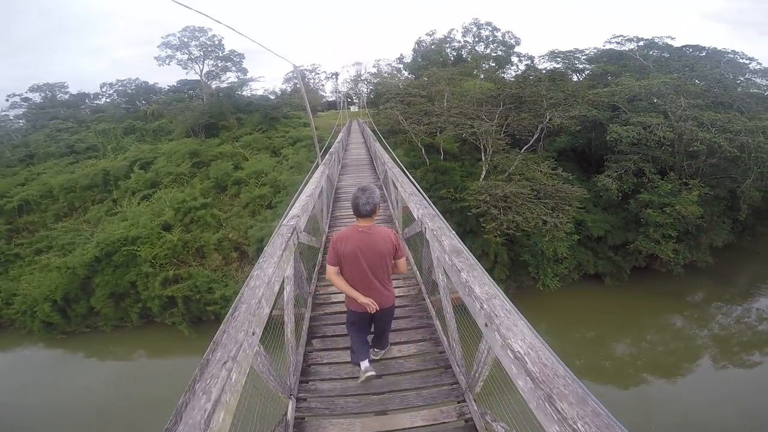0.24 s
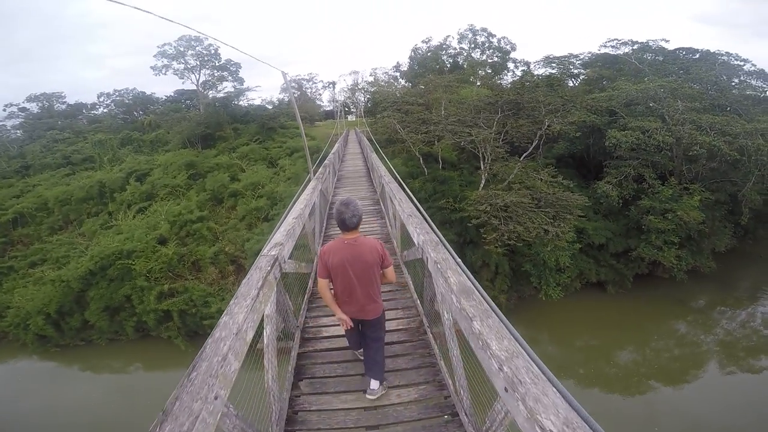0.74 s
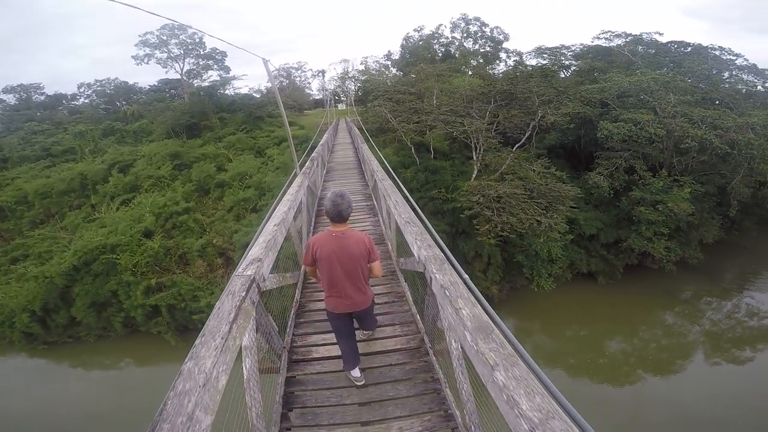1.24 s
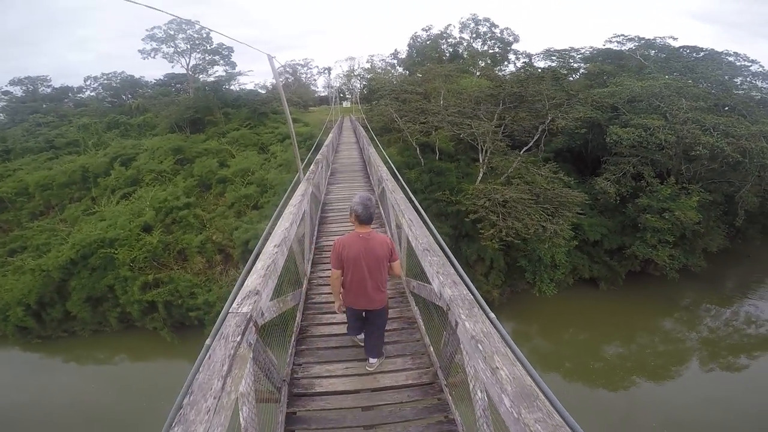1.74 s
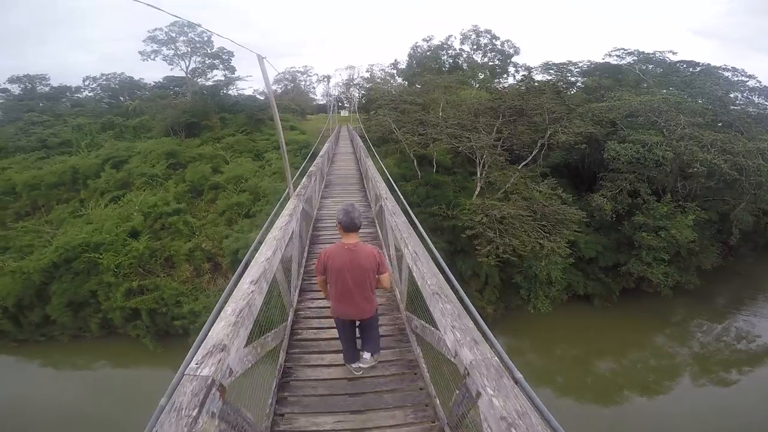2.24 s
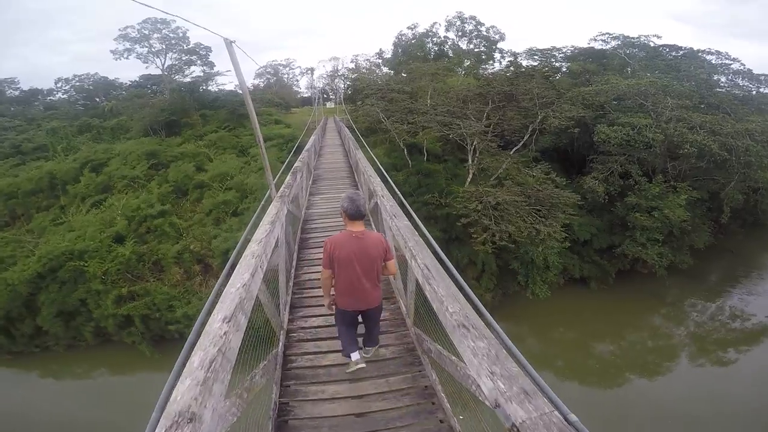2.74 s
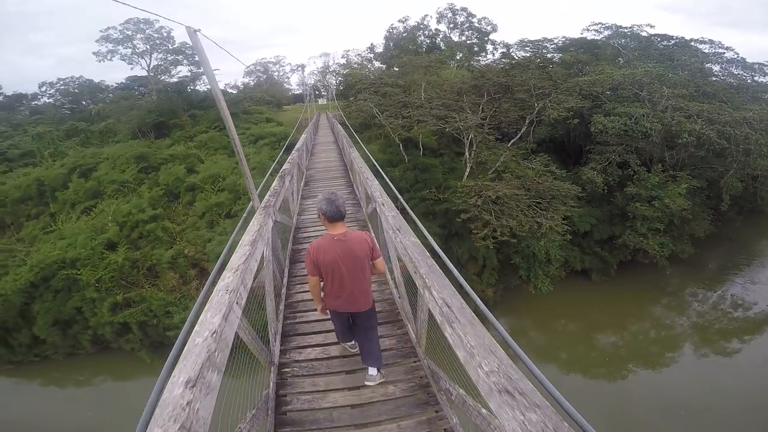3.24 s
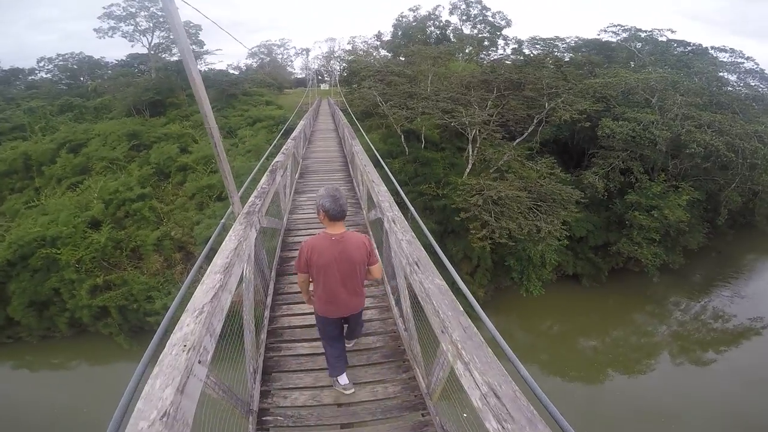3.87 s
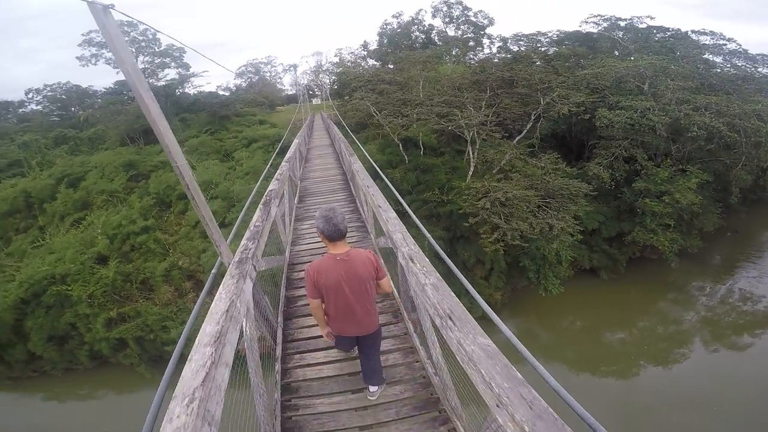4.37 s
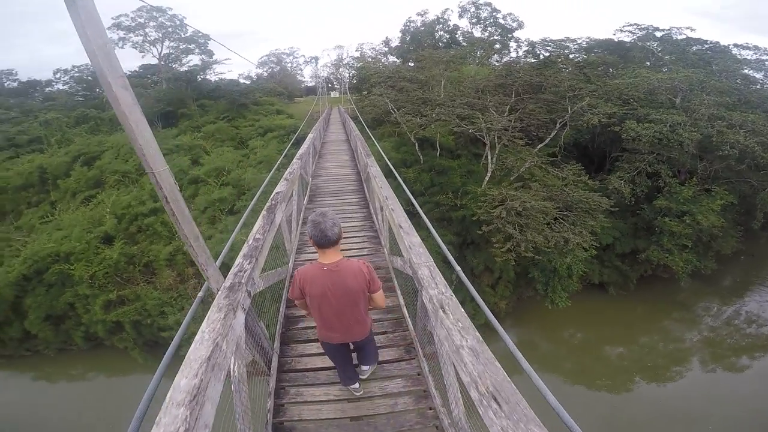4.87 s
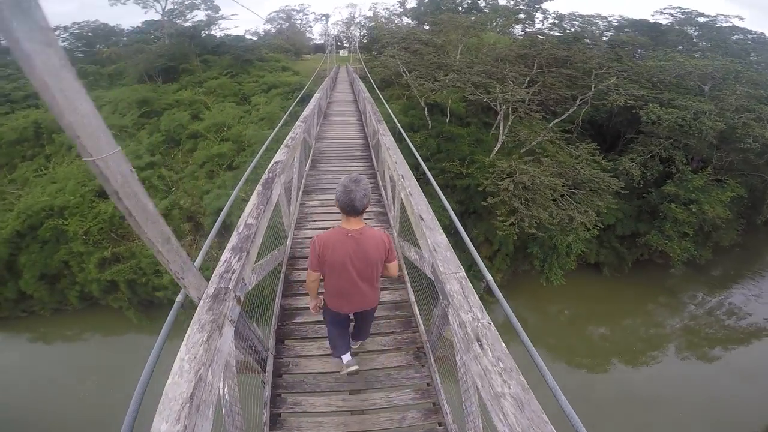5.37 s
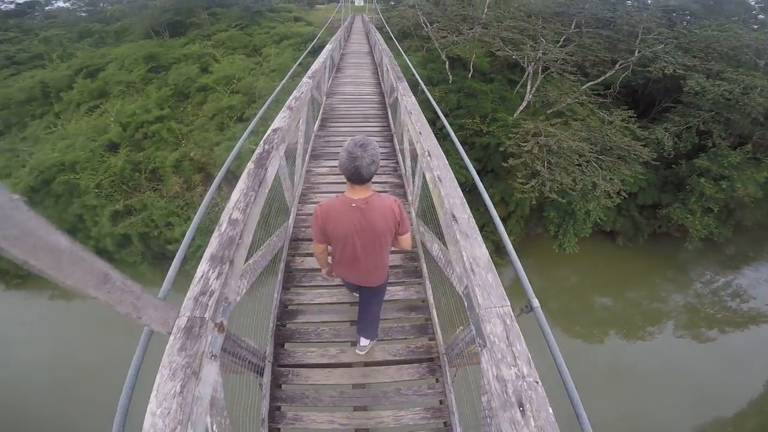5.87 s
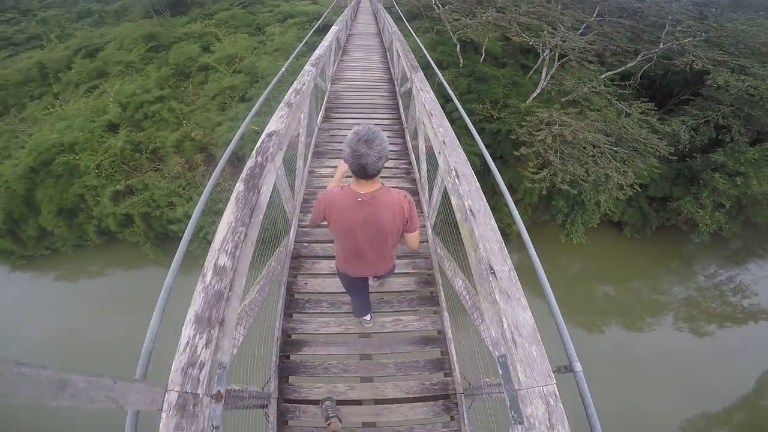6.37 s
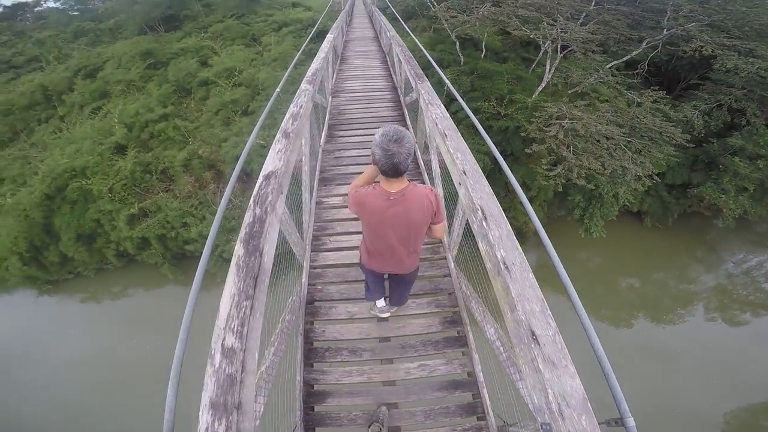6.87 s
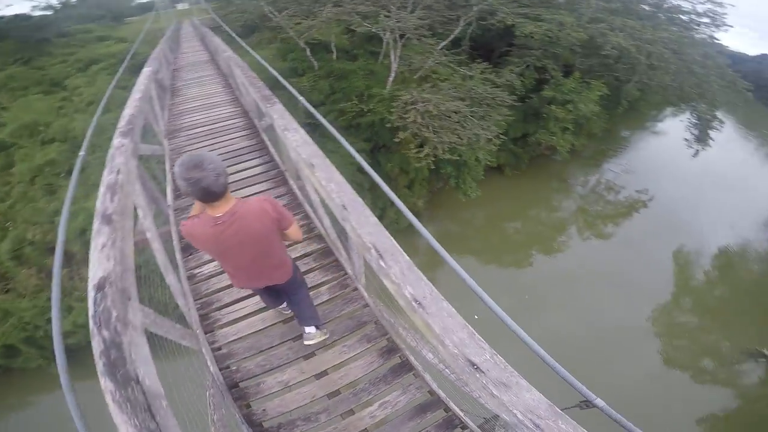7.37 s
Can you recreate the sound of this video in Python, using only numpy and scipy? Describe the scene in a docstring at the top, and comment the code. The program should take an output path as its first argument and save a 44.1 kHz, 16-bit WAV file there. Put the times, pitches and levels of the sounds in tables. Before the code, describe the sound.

Two people walk across an old wooden footbridge above a slow river. Shoes clack, knock and scuff unevenly on loose planks, with faint rattles and low beam drumming after steps. A hand-held microphone pole bumps and hums softly, with deep sway and wind rumble. Birds whistle and chirp from the forested bank with echoes. A joint creaks around five seconds, then tocks dully.

```python
"""Two people walk over the loose planks of a footbridge above a slow river, one with a microphone on a pole.
Shoes clack and scuff: rough contacts ring the resonances of planks and beams, and joints slip with creaks.
The pole hums in decaying sines as the hand bumps it, and sways at low pitch; wind noise rumbles on the microphone.
Birds whistle and chirp on the bank as bending sines with echoes, over a noise hush of leaves, water and insects."""
import sys
import numpy as np
from scipy import signal
from scipy.fft import rfft, irfft
from scipy.io import wavfile

SR = 44100
rng = np.random.default_rng(int(sys.argv[2]) if len(sys.argv) > 2 else 0)


def transcribe(signal):
    """Save signal, clipped to [-1, 1], as a 16-bit WAV file at the path in sys.argv[1]."""
    frames = np.atleast_2d(signal).T
    limited = np.clip(frames, -1, 1)
    pcm = np.round(limited * 32767).astype(np.int16)
    wavfile.write(sys.argv[1], SR, pcm)


N = 335160
TIME = np.arange(N) / SR  # seconds

# Feet that land and take weight. Each row: start in seconds, then relative levels: clack in dB, low knock
# against the clack in dB, sole snap against the clack in dB, beam drumming in dB.
FOOTFALLS = [(0.007, -48, -14, -21, -49.5), (0.695, -57, -20, 1, -55.5), (0.883, -46.5, -0.5, -3, -52.5),
             (1.365, -48, -7.5, 2, -51), (1.425, -51, -13, -10, -52), (1.998, -42, -5.5, -6, -53),
             (2.63, -48, -7, -9.5, -51.5), (2.82, -62.5, 8.5, -2, -59), (3.37, -45, -3, -5.5, -51),
             (3.93, -44.5, -11, -7, -54.5), (4.561, -53.5, -7, -2.5, -55), (5.327, -55.5, 7, -7, -69),
             (5.922, -57, -7, -16, -61), (6.519, -40.5, -13.5, -5.5, -51.5), (6.595, -42, -20, -5.5, -60),
             (7.301, -46.5, -12, 3.5, -47.5)]
# Plank resonances. Each row: frequency in Hz, bandwidth in Hz, relative level in dB.
PLANK_MODES = [(408, 170, -3.5), (525, 88, 0.5), (734, 260, -3), (823, 23.6, 7.5), (890, 95, 5),
               (976, 71, 10), (1041, 43, 7.5), (1205, 280, 0), (1754, 310, -3.5), (2460, 480, -6.5),
               (3530, 300, 3.5), (4127, 366, -2.5), (5210, 97, -5), (6960, 2250, -16), (10800, 9900, -51)]


def from_db(db):
    """The decibel is logarithmic: 20 dB is a tenfold amplitude."""
    return 10 ** (np.asarray(db) / 20)


def rms_one(x):
    """Normalisation: mean power is brought to one."""
    return x / np.sqrt(np.mean(x ** 2) + 1e-20)


def add(track, s, sound):
    """Superposition: a sound is summed into the track from time s in seconds."""
    at = int(np.clip(s * SR, 0, N - 1))
    track[at:at + len(sound)] += sound[:N - at]


def drift(rate):
    """Slow random modulation: straight lines join normal random knots, rate of them a second."""
    knots = rng.standard_normal(4000)
    return np.interp(TIME * rate, np.arange(len(knots)), knots)


def coloured_noise(spectrum):
    """Spectral shaping: white noise is weighted over log frequency, then brought to unit rms."""
    hz, db = np.transpose(spectrum)
    bins = np.maximum(np.fft.rfftfreq(N, 1 / SR), 1)
    weight = from_db(np.interp(np.log(bins), np.log(hz), db))
    return rms_one(irfft(rfft(rng.standard_normal(N)) * weight, N))


def resonate(x, hz, width):
    """Damped resonance: a pole pair rings at hz with the given bandwidth and unit peak gain."""
    r = np.exp(-np.pi * width / SR)
    zeros = np.array([1, 0, -1]) * (1 - r * r) / 2
    poles = [1, -2 * r * np.cos(2 * np.pi * hz / SR), r * r]
    return signal.lfilter(zeros, poles, x + 1e-18)


def ring_modes(force, modes):
    """Modal synthesis: each mode rings to its own level, neighbours in opposite phase."""
    out = 0
    for k, (hz, width, db) in enumerate(modes):
        ring = resonate(force, hz, width)
        gain = from_db(db) * np.sqrt(width / SR) / np.linalg.norm(ring)
        out = out + (-1) ** k * gain * ring
    return out


def contact(length, grain_db):
    """Rough contact: two faces meet in a quick, dying run of tiny uneven impacts of unit total energy."""
    t = TIME[:SR // 5]
    force = rng.standard_normal(len(t)) * from_db(grain_db * rng.standard_normal(len(t)))
    force *= (1 - np.exp(-t / .001)) * np.exp(-t / max(length, .0003))
    return force / np.linalg.norm(force)


def scatter(x, t60, wet_db):
    """Diffuse reflection: a noise tail, starting after 6 ms, falls 60 dB in t60 seconds."""
    t = TIME[:SR]
    tail = rng.standard_normal(SR) * np.exp(-np.log(1000) * t / t60) * (t > .006)
    return x + from_db(wet_db) * signal.fftconvolve(x, tail / np.linalg.norm(tail))[:N]


def swells(pushes, rise_s, decay_s):
    """Superposed envelopes: each push (s, dB) builds up and dies away exponentially."""
    out, t = np.zeros(N), TIME[:SR]
    for s, db in pushes:
        add(out, s, from_db(db) * (1 - np.exp(-(t / rise_s) ** 2)) * np.exp(-t / decay_s))
    return out


def forest(level_db):
    """Broadband and narrow-band noise: an even hush of leaves and water, with a few thin tones on top."""
    # Forest hush. Each row: frequency in Hz, relative density in dB per Hz.
    hush_spectrum = [(120, -30), (200, -1.5), (258, -6.5), (521, -10), (748, -12), (964, -10.5),
                     (1410, -15), (2300, -13.5), (2700, -15), (3540, -14.5), (4480, -19), (5470, -16.5),
                     (8290, -23), (13300, -27.5), (15000, -31)]
    # Thin steady tones. Each row: frequency in Hz, bandwidth in Hz, rms level in dB.
    thin_tones = [(3630, 330, -78.5), (4150, 270, -85.5), (5470, 67, -86.5), (12230, 11, -93)]
    out = coloured_noise(hush_spectrum) * from_db(level_db)
    for hz, width, db in thin_tones:
        out = out + from_db(db) * rms_one(resonate(rng.standard_normal(N), hz, width))
    return out


def rumble(sway_hz, sway_wander, sway_db, wind_db, gust_db, draught_db, shudder_db):
    """Bending and turbulence: jolts sway the pole's lowest mode; gusts, sway and steps stir air at the mic."""
    # Jerks of the arm that set the pole swaying. Each row: start in seconds, relative level in dB.
    jolts = [(0.0, -33.5), (0.69, -31.5), (1.02, -28.5), (1.41, -25), (1.65, -31.5), (1.88, -24.5),
             (2.69, -21.5), (2.92, -45), (3.35, -26.5), (3.96, -29), (4.15, -33), (4.61, -32.5),
             (5.28, -28.5), (5.63, -33.5), (5.88, -26.5), (6.49, -27), (6.83, -31), (7.17, -24)]
    # Breeze at the microphone, joined by straight lines. Each row: time in seconds, relative level in dB.
    breeze_level = [(0, -51), (.4, -63), (1.4, -49.5), (2.5, -58), (3.3, -49), (4.6, -59), (5.25, -44.5),
                    (5.8, -55.5), (6.5, -52), (7.6, -51)]
    # Wind noise. Each row: frequency in Hz, relative density in dB per Hz.
    wind_spectrum = [(20, 10), (38, 6), (60, 5.5), (100, 0), (140, -9), (185, -13), (250, -24.5),
                     (400, -35), (800, -48)]
    swing = swells(jolts, rise_s=0.021, decay_s=0.13)
    # the microphone shudders at each footfall
    steps = [(s, db + shudder_db) for s, *_, db in FOOTFALLS]
    shudder = swells(steps, rise_s=0.011, decay_s=0.065)

    wandering_hz = sway_hz * (1 + sway_wander * drift(16))
    sway = rms_one(np.sin(2 * np.pi * np.cumsum(wandering_hz) / SR))
    # the unsteady arm never lets the pole rest entirely
    unrest = from_db(-41.5 + 2.5 * drift(7))
    sway_level = np.hypot(swing * from_db(sway_db), unrest)

    breeze = from_db(np.interp(TIME, *np.transpose(breeze_level)) + wind_db + gust_db * drift(12))
    air_level = np.sqrt(breeze ** 2 + (swing * from_db(draught_db)) ** 2 + shudder ** 2)
    return sway * sway_level + coloured_noise(wind_spectrum) * air_level


def footsteps(level_db, knock_db, board_db, snap_db):
    """Modal excitation: each contact rings the plank; the landing weights low, middle and high modes."""
    # Shoes graze the boards without weight. Each row: start in seconds, relative clack level in dB,
    # sole snap against the clack in dB.
    scuffs = [(0.074, -66, -7), (0.213, -56, 1), (2.021, -50.5, 1.5), (2.703, -54.5, 2.5), (3.306, -50, -1),
              (3.339, -52, -5), (3.835, -61, -8), (4.025, -55.5, -7), (4.458, -61, -6),
              (5.288, -57.5, -2.5), (5.861, -59, -1), (6.505, -54.5, -23), (7.201, -65, 1),
              (7.295, -48.5, -3), (7.317, -44, -24), (7.334, -51.5, 9)]
    footfall_contact_s, scuff_contact_s = 0.0075, 0.005
    scuff_knock_db = -12  # before knock_db is added
    out = np.zeros(N)
    hz, width, mode_db = np.transpose(PLANK_MODES)
    touches = [(s, db, knock, snap, footfall_contact_s) for s, db, knock, snap, _ in FOOTFALLS]
    touches += [(s, db, scuff_knock_db, snap, scuff_contact_s) for s, db, snap in scuffs]
    for s, db, knock, snap, length in touches:
        weights_db = [knock + knock_db, board_db, board_db, snap + snap_db]
        colour = np.interp(hz, [550, 750, 2200, 3300], weights_db)
        plank = zip(hz, width, mode_db + colour)
        add(out, s, from_db(db + level_db) * ring_modes(contact(length, grain_db=4.5), plank))
    # the deck and railings rattle on after each step
    rattle = scatter(out, t60=0.17, wet_db=-10.5)
    return scatter(rattle, t60=0.58, wet_db=-14.0)


def shuffle(level_db, rise_s, decay_s, grain_db):
    """Sliding friction: as the weight rolls over it, the sole rubs softly on the grit of the plank."""
    # What a rubbing sole stirs in the plank. Each row: frequency in Hz, bandwidth in Hz, relative level in dB.
    rub_modes = [(315, 126, 3.5), (690, 270, -3.5), (1060, 520, -3)]
    pressure = swells([(s, db) for s, *_, db in FOOTFALLS], rise_s, decay_s)
    grit = rng.standard_normal(N) * from_db(grain_db * drift(90))
    return from_db(level_db) * pressure * rms_one(ring_modes(grit, rub_modes))


def beams(level_db, press_s):
    """Slower loading: the walker's weight makes the beams under the planks drum in their low modes."""
    # Beam resonances. Each row: frequency in Hz, bandwidth in Hz, relative level in dB.
    beam_modes = [(242, 19, -1.5), (278.3, 7.4, 1.5), (308.7, 17, -3.5), (382, 49, -28)]
    out = np.zeros(N)
    for s, *_, db in FOOTFALLS:
        press = contact(press_s, grain_db=6.5)
        add(out, s, from_db(db + level_db) * ring_modes(press, beam_modes))
    return out


def settling(count, level_db, within_s):
    """Delayed slip: loose boards shift faintly count times after each foot has loaded them."""
    out = np.zeros(N)
    for s, *_ in FOOTFALLS:
        for late, weak, long in rng.random((count, 3)):
            shift = ring_modes(contact(.003 + 0.012 * long, grain_db=1.0), PLANK_MODES)
            add(out, s + .03 + within_s * late, from_db(level_db - 8.7 * weak) * shift)
    return out


def bird(notes, waver, flutter_db, taper):
    """Frequency modulation: near-pure notes bend through three pitches, swelling and fading."""
    out, tremble, flutter = np.zeros(N), drift(130), drift(45)
    for s, length, start, middle, end, db in notes:
        u = np.linspace(0, 1, int(length * SR))  # progress through the note
        here = (int(s * SR) + np.arange(len(u))) % N
        parabola = np.polyfit([0, .5, 1], [start, middle, end], 2)
        hz = np.polyval(parabola, u) * (1 + waver * tremble[here])
        swell = np.abs(np.sin(np.pi * u)) ** taper * from_db(db + flutter_db * flutter[here])
        add(out, s, swell * np.sin(2 * np.pi * np.cumsum(hz) / SR))
    return out


def bent(calls, bend):
    """Pitch glide: every call starts and ends the same (start, end) Hz away from its own middle pitch."""
    return [(s, length, hz + bend[0], hz, hz + bend[1], db) for s, length, hz, db in calls]


def repeated(calls, length, hz, bend):
    """Stereotyped song: one note has the same length, pitch and glide every time."""
    return bent([(s, length, hz, db) for s, db in calls], bend)


def birds():
    """Source and reverberation: several birds sing on the bank, each echoed by the trees."""
    # Long level whistles of two birds, one pitched above the other. Each row: start in seconds,
    # length in seconds, middle pitch in Hz, starting offset from it in Hz, relative level in dB.
    whistle_calls = [(0.069, 0.2, 2602, 105, -61), (1.04, 0.23, 2582, 70, -59), (1.93, 0.22, 2597, -9, -59),
                     (2.92, 0.2, 2599, -34, -59.5), (3.32, 0.18, 2888, -40, -68),
                     (3.81, 0.22, 2852, -52, -67.5), (4.09, 0.19, 2597, -42, -64),
                     (4.31, .228, 2830, -53, -66.5), (4.81, 0.19, 2797, -2, -65),
                     (5.33, 0.23, 2823, -57, -69), (5.91, .258, 2826, -67, -71.5)]
    # Arched calls, high notes that rise and level off, and short plain pips of other birds.
    # Each row: start in seconds, length in seconds, middle pitch in Hz, relative level in dB.
    arches = [(1.85, 0.09, 3830, -59.5), (2.09, 0.21, 3370, -62.5), (4.745, 0.083, 3690, -54.5),
              (4.95, .25, 3350, -59.5), (7.5, 0.22, 3520, -60)]
    upslurs = [(4.28, .075, 4130, -71), (4.42, 0.068, 4160, -71), (4.91, .07, 4030, -63.5),
               (5.795, 0.09, 3940, -56), (6.33, 0.075, 3970, -57), (6.865, .06, 4030, -56),
               (7.45, 0.082, 4050, -66.5)]
    pips = [(.075, 0.013, 7270, -63.5), (.715, 0.032, 8280, -66), (2.81, 0.041, 2950, -63),
            (5.845, .035, 2070, -63.5), (6.66, 0.036, 3740, -61), (7.55, 0.059, 2840, -63.5)]
    # Falling slurs, sharp rising chirps about a second apart, and low, steeply peaked yelps.
    # Each row: start in seconds, relative level in dB.
    falls = [(2.81, -66), (6.02, -67.5)]
    peep_calls = [(.707, -45.5), (1.603, -50), (2.583, -47), (3.763, -47)]
    yelp_calls = [(.938, -58.5), (1.824, -58), (2.81, -58), (3.976, -60)]
    # Glides of these calls. Each pair: start and end in Hz from the middle pitch.
    arch_bend = (-330, -430)
    upslur_bend = (-200, 10)
    pip_bend = (42, -42)
    fall_bend = (250, -310)
    peep_bend = (-230, 170)
    yelp_bend = (-600, -700)

    lift_hz = 37.4  # every whistle ends a little above its middle pitch
    whistles = [(s, length, hz + above, hz, hz + lift_hz, db) for s, length, hz, above, db in whistle_calls]
    slurs = bent(arches, arch_bend) + bent(upslurs, upslur_bend) + bent(pips, pip_bend)
    slurs += repeated(falls, length=0.13, hz=3320, bend=fall_bend)
    peeps = repeated(peep_calls, length=0.0264, hz=3560, bend=peep_bend)
    yelps = repeated(yelp_calls, length=0.039, hz=2020, bend=yelp_bend)

    whistler = scatter(bird(whistles, waver=0.0037, flutter_db=1.3, taper=0.84), t60=0.9, wet_db=-8.0)
    callers = scatter(bird(slurs, waver=0.0064, flutter_db=0.5, taper=0.78), t60=1.0, wet_db=-6.0)
    chirper = scatter(bird(peeps, waver=0.015, flutter_db=1.5, taper=0.81), t60=1.0, wet_db=-10.5)
    yelper = scatter(bird(yelps, waver=0.015, flutter_db=1.0, taper=0.5), t60=.5, wet_db=-9)
    near = from_db(5.0) * whistler + from_db(1.0) * callers
    return near + from_db(-0.5) * chirper + from_db(-1) * yelper


def far_calls(count, level_db):
    """Reverberant field: faint arched notes come at random from deep among the trees, more echo than note."""
    notes = []
    for when, long, high, far in rng.random((count, 4)):
        start, middle, end = 3200 + 600 * high, 3450 + 650 * high, 3350 + 700 * high  # Hz
        notes.append((when * N / SR, 0.045 + 0.074 * long, start, middle, end, level_db - 3 * far))
    return scatter(bird(notes, waver=.018, flutter_db=1.5, taper=.6), t60=0.3, wet_db=8)


def pole_bumps(count, upper_db, push_s):
    """Free vibration: soft pushes and small nudges set the pole humming; the grip detunes it each time."""
    # Bumps of the pole in the hand. Each row: start in seconds, relative level in dB,
    # relative level of the modes above 150 Hz in dB.
    bumps = [(0.531, -38, -13.5), (1.031, -38, -21), (1.28, -37.5, -6.5), (1.36, -38, -11.5),
             (1.496, -36, -13), (1.6, -28.5, -25), (1.983, -41, -8), (2.22, -37, -11), (2.244, -31.5, -12),
             (2.31, -38.5, -17), (2.504, -34, -14), (2.813, -30.5, -16), (3.062, -36.5, -12.5),
             (3.237, -34, -15.5), (3.388, -42, -4), (3.448, -34.5, -13), (3.513, -37.5, -12.5),
             (3.97, -43.5, -6.5), (4.195, -45, -17), (4.867, -37, -8), (4.91, -36, -15),
             (5.285, -32.5, -11.5), (5.409, -35, -13), (5.551, -34.5, -16), (5.582, -32, -15.5),
             (5.925, -34, -14), (6.541, -47, -2.5), (6.657, -45.5, -11), (6.943, -42.5, -21),
             (7.09, -40.5, -17), (7.149, -39.5, -7)]
    # Pole resonances. Each row: frequency before detuning in Hz, relative level in dB,
    # 60 dB decay time in seconds.
    pole_modes = [(105, -0.5, 0.36), (89.5, 3.5, 0.12), (124.8, -4.5, 0.13), (180.7, -0.5, 0.29),
                  (208, -13, 0.054), (266.6, -32, 0.34)]
    out, t = np.zeros(N), TIME[:SR // 2]
    # the grip's small shifts, one at random in each of count equal spans
    nudges = [((k + when) / count * N / SR, -42.5 - 1.5 * weak, -21)
              for k, (when, weak) in enumerate(rng.random((count, 2)))]
    for s, db, upper in bumps + nudges:
        for hz, mode_db, t60 in pole_modes:
            detune, phase = rng.standard_normal(), rng.uniform(0, 2 * np.pi)
            hardness = (upper + upper_db) * (hz > 150)
            swing = np.sin(2 * np.pi * hz * (1 + 0.026 * detune) * t + phase)
            shape = (1 - np.exp(-(t / push_s) ** 2)) * np.exp(-np.log(1000) * t / t60)
            add(out, s, from_db(db + mode_db + hardness) * shape * swing)
    return out


def creaks(level_db, dull_hz):
    """Frictional slip: a timber rasps in its joint when slow, or gives a dull, hollow tock all at once."""
    # Joints slipping under the weight. Each row: start in seconds, relative level in dB,
    # decay time of the slip in seconds.
    slips = [(4.97, -49, 0.032), (5.016, -43, 0.12), (5.066, -47.5, 0.0059), (5.11, -53, 0.014),
             (5.286, -55, 0.031), (5.6285, -38.5, 0.00035)]
    # Joint resonances. Each row: frequency in Hz, bandwidth in Hz, relative level in dB.
    joint_modes = [(510, 24, 6), (1285, 150, 2.5), (1500, 310, -1.5), (2270, 190, -6.5), (2800, 99, -5.5)]
    out = np.zeros(N)
    for s, db, length in slips:
        slip = contact(length, grain_db=3.0)
        add(out, s, from_db(db + level_db) * ring_modes(slip, joint_modes))
    dull = signal.sosfilt(signal.butter(4, dull_hz, fs=SR, output="sos"), out)
    return scatter(dull, t60=0.12, wet_db=-17)


def scene():
    """Superposition: deck, pole and forest sum at one microphone."""
    bank = forest(level_db=-63.45)
    air = rumble(sway_hz=25.57, sway_wander=0.1112, sway_db=3.0,
                 wind_db=4.5, gust_db=3.0, draught_db=-21, shudder_db=10.5)
    shoes = footsteps(level_db=33.5, knock_db=15.5, board_db=8.0, snap_db=6.5)
    shoes = shoes + shuffle(level_db=-11.5, rise_s=0.011, decay_s=.1, grain_db=2.5)
    timbers = beams(level_db=59, press_s=0.017)
    shoes = shoes + settling(count=2, level_db=-25.5, within_s=.15)
    bank = bank + birds() + far_calls(count=18, level_db=-76.5)
    pole = pole_bumps(count=20, upper_db=4.5, push_s=0.009)
    timbers = timbers + creaks(level_db=37.5, dull_hz=3020)
    return (shoes + timbers + pole + air + bank)[None]


def record(dry):
    """Band limiting: a steep elliptic low-pass removes the top above 15.2 kHz."""
    return signal.sosfilt(signal.ellip(10, .1, 80, 15200, fs=SR, output="sos"), dry)


dry = scene()
out = record(dry)
transcribe(out)
```